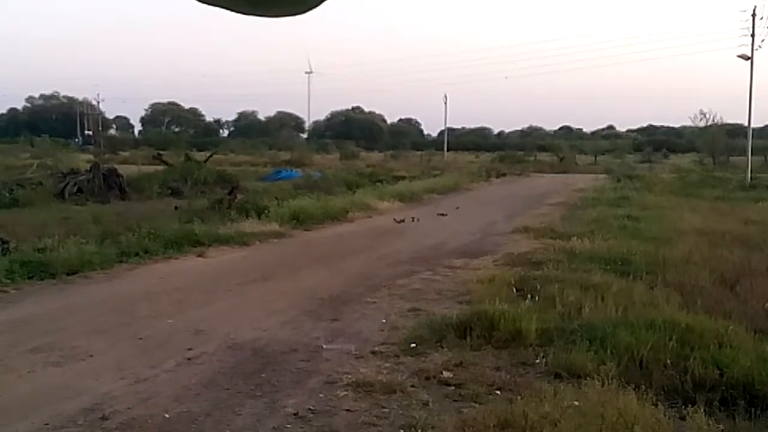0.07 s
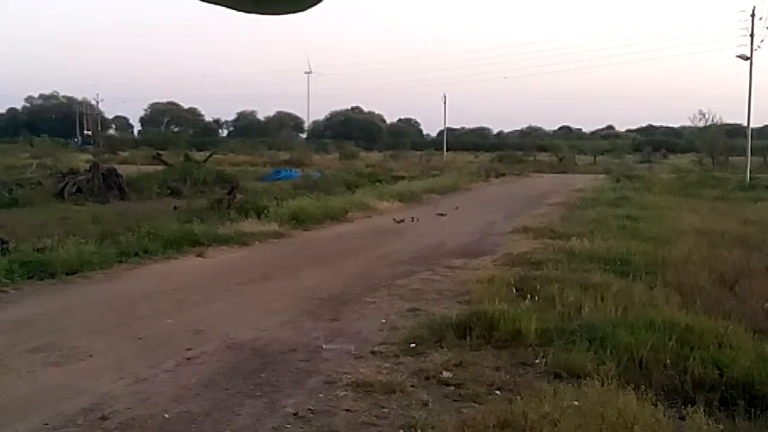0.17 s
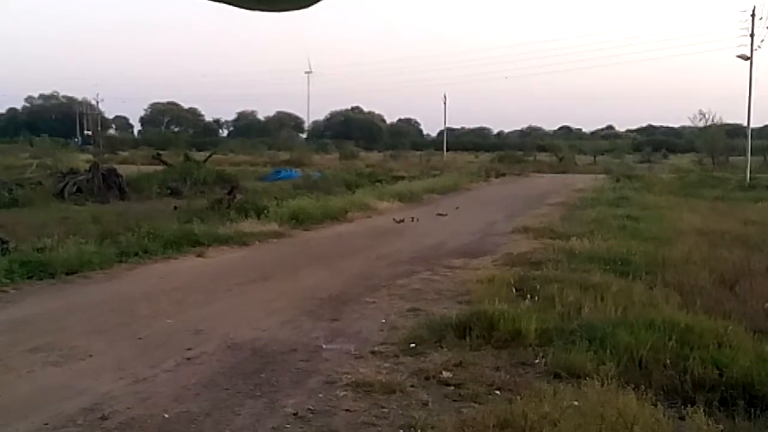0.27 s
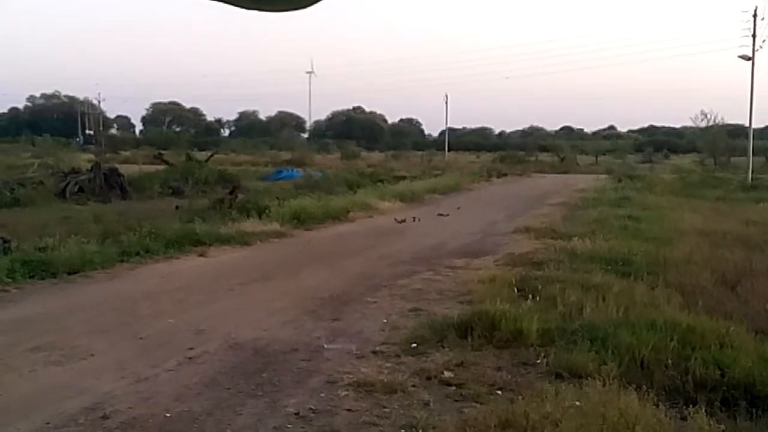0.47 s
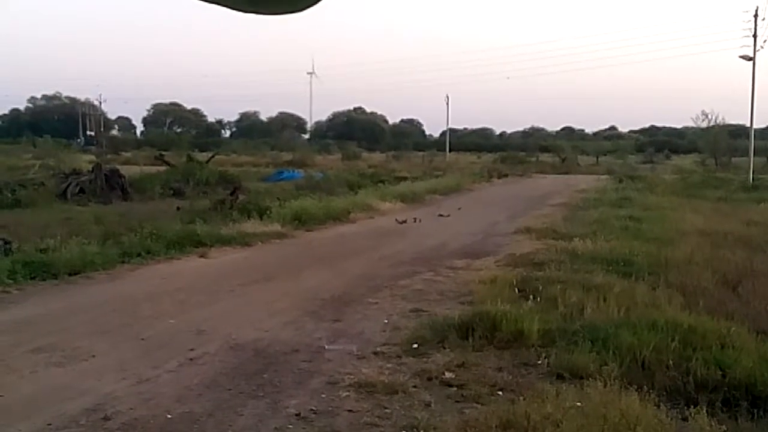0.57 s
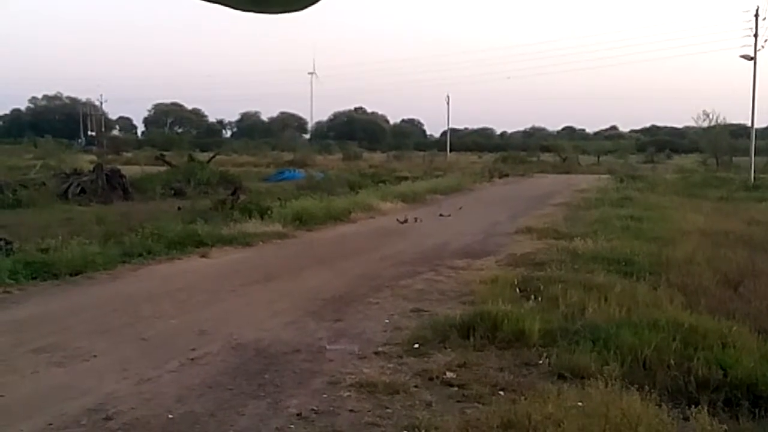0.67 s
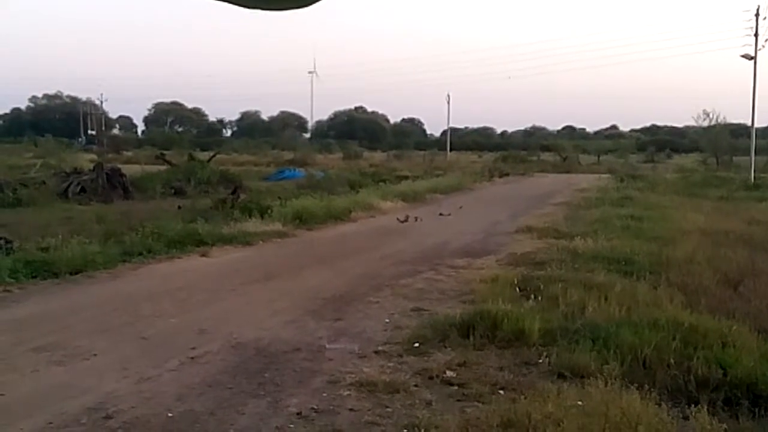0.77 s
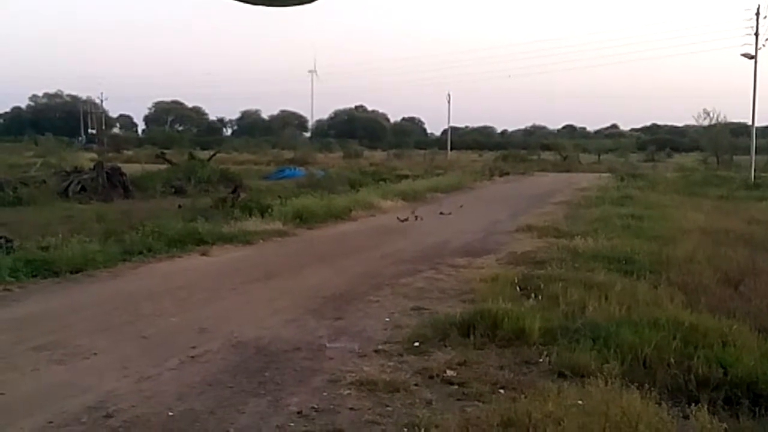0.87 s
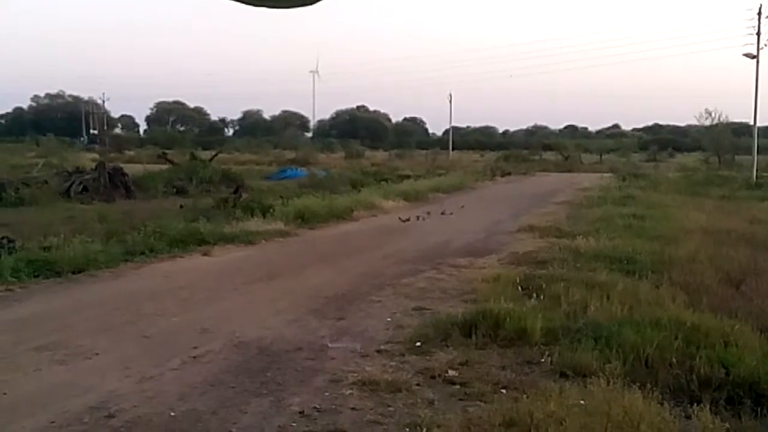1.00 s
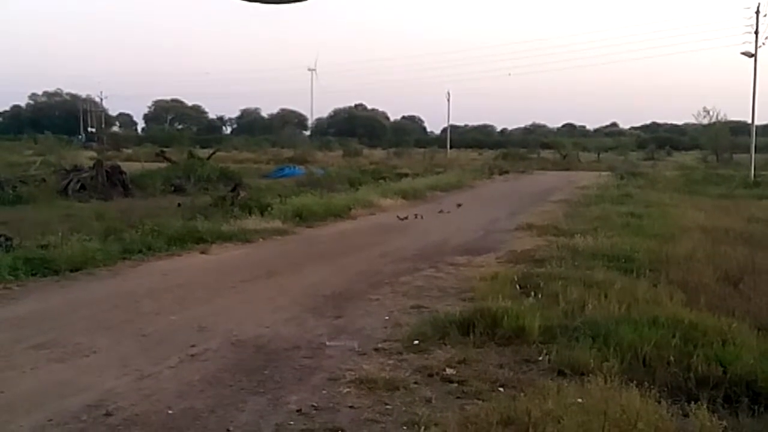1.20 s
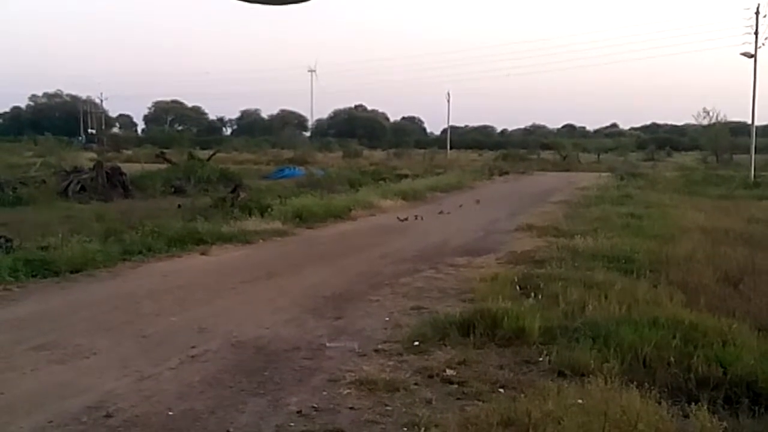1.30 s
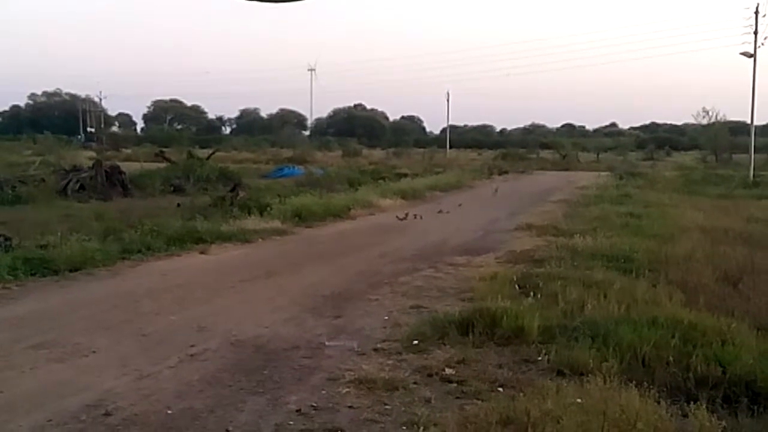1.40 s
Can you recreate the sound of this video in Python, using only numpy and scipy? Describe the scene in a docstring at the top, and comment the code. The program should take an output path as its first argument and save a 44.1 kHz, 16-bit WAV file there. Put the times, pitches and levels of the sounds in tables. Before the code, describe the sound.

One short, harsh, high bird squawk bursts out close to the microphone near the start, then only quiet distant chirps, throbbing wails, faint insect buzzes and soft air remain over open fields beside a dirt road.

```python
"""One harsh bird squawk close by, on a dirt road through open fields.
The squawk sums a steady low voice, two roughly wavering high whistles and rasping noise shaped by the throat.
A flutter pulses the whistles and rasp, then dies out, and the whistles clear towards the end.
Far off, birds wail, chirp and hoot as gliding sines, and insects buzz as narrow noise, over a soft wash of air.
Delayed copies of the squawk are faint echoes from ground and bushes; grass and trees add a diffuse tail."""
import sys
import numpy as np
from scipy import signal
from scipy.fft import rfft, irfft
from scipy.io import wavfile

SR = 44100
rng = np.random.default_rng(int(sys.argv[2]) if len(sys.argv) > 2 else 0)


def materialize(psi):
    """Save the field psi as 16-bit PCM at rate SR to the path in sys.argv[1].

    A 1-D psi becomes a single channel; in a 2-D psi each row is a channel.
    """
    bounded = np.clip(np.atleast_2d(psi).T, -1, 1)
    quanta = np.round(bounded * 32767).astype(np.int16)
    wavfile.write(sys.argv[1], SR, quanta)


N = 63945

CHIRP_FALL = 0.1005  # share of its start pitch that a chirp slides down
FAR_T60_S = .35  # time for the distant tail to decay by 60 dB


def undb(db):
    """Decibels to gain."""
    return 10 ** (np.asarray(db) / 20)


def unit(x):
    """Scale to rms 1."""
    return x / np.sqrt(np.mean(x ** 2))


def clock():
    """Time of every sample in seconds."""
    return np.arange(N) / SR


def curves(table):
    """The columns after time, joined by straight lines in time."""
    rows = np.array(table, float)
    return [np.interp(clock(), rows[:, 0], column) for column in rows.T[1:]]


def coloured(x, points):
    """Filter a sound by (f/Hz, level/dB) points joined over log frequency; rms 1."""
    hz, db = np.array(points, float).T
    f = np.fft.rfftfreq(N, 1 / SR) + 1  # offset avoids log(0)
    gain = undb(np.interp(np.log(f), np.log(hz), db))
    return unit(irfft(rfft(x) * gain, N))


def band(hz, width_hz):
    """Noise of rms 1 in a bell-shaped band; centred on 0 it is a random waver."""
    f = np.fft.rfftfreq(N, 1 / SR)
    bell = np.exp(-.5 * ((f - hz) / width_hz) ** 2)
    return unit(irfft(rfft(rng.standard_normal(N)) * bell, N))


def tone(hz):
    """A sine of rms 1 that follows a pitch curve."""
    phase = 2 * np.pi * np.cumsum(hz) / SR
    return np.sqrt(2) * np.sin(phase)


def note(start, length):
    """Progress 0-1 through a note, and its rounded envelope."""
    u = np.clip((clock() - start) / length, 0, 1)
    return u, np.sin(np.pi * u)


def scatter(x, t60, wet_db):
    """Diffuse tail thrown back by grass and trees: convolution with decaying noise of unit energy."""
    decay = np.exp(-np.log(1000) * clock() / t60)
    onset = np.minimum(clock() / .008, 1)
    tail = rng.standard_normal(N) * decay * onset
    return undb(wet_db) * signal.fftconvolve(x, tail / np.linalg.norm(tail))[:N]


def air():
    """The wash of the open fields as coloured noise, with soft swells and a faint low rumble."""
    # spectrum of the wash: f/Hz, relative level/dB
    wash_colour = [(15, -51), (25, -23), (71, -21.5), (119, -9), (227, -15), (399, -13.5), (665, -7.5),
                   (782, -9.5), (1080, -4), (1270, -7), (1530, -6), (2350, -11), (2620, -11.5),
                   (3160, -6.5), (3520, -4.5), (3820, -5), (4250, -9), (4740, -15), (5870, -14),
                   (6370, -13.5), (7090, -23.5), (8110, -38.5), (15500, -52.5)]
    # loudness of the wash: t/s, level/dB
    wash_level = [(0, -53), (.2, -53), (.48, -53), (.62, -49.5), (.8, -54), (.92, -51.5), (1.1, -53),
                  (1.33, -55), (1.41, -52.5), (1.45, -52.5)]
    # distant swells of narrow noise: t/s, length/s, centre f/Hz, width/Hz, level/dB
    swell_notes = [(0.0, 0.12, 221, 8.3, -66), (.14, 0.12, 163.4, 16, -63), (0.338, 0.076, 345, 16, -60.5),
                   (0.847, 0.13, 1050, 260, -64), (1.013, 0.33, 136, 14.6, -72),
                   (1.126, .12, 1933, 48, -60.5), (1.372, 0.073, 960, 210, -56.5)]
    # loudness of the rumble: t/s, level/dB
    rumble_level = [(0, -81.5), (.65, -80), (.85, -66.5), (1.0, -82.5), (1.2, -70), (1.45, -78.5)]
    wash = coloured(rng.standard_normal(N), wash_colour) * undb(curves(wash_level)[0])
    swells = 0
    for start, length, hz, width, db in swell_notes:
        swells = swells + undb(db) * note(start, length)[1] * band(hz, width)
    rumble = band(hz=69, width_hz=9.8) * undb(curves(rumble_level)[0])
    return wash + swells + rumble


def chirp(start, length, hz, db, fall):
    """A short sine whistle that slides down by a share of its pitch; a fall of 0 holds it level."""
    u, envelope = note(start, length)
    return undb(db) * envelope * tone(hz * (1 - fall * u))


def flock(count=150):
    """Many farther birds: chirps at random times and pitches run together with their diffuse tail."""
    # loudness of the flock: t/s, level/dB
    flock_level = [(0, -43), (.1, -65), (.17, -50), (.45, -51), (.55, -53.5), (.69, -48.5), (.79, -68.5),
                   (.93, -50.5), (1.05, -75), (1.2, -53.5), (1.3, -60), (1.36, -51.5), (1.45, -59.5)]
    centre_hz, spread = 3799, .11  # spread: largest pitch offset as a share of the centre
    chirps = 0
    for when, length, pitch, size in rng.random((count, 4)):
        start_s = when * N / SR - .01
        length_s = 0.01424 + 0.0191 * length
        hz = centre_hz * (1 + spread * (2 * pitch - 1))
        chirps = chirps + chirp(start_s, length_s, hz, -6 * size, CHIRP_FALL)
    blurred = chirps + scatter(chirps, FAR_T60_S, wet_db=2.5)
    return unit(blurred) * undb(curves(flock_level)[0])


def wails():
    """A far bird repeats a throbbing note: pitch arcs up a little, then sags, while level pulses."""
    # wailing calls: t/s, length/s, top f/Hz before waver, level/dB before envelope and throb
    wail_notes = [(0.005, 0.18, 1609, -50), (0.487, .285, 1630, -52), (1.347, 0.21, 1582, -51.5)]
    top_share, sag, waver = .24, .32, 0.0219  # place of the top in the note; pitch shares
    throb_hz, throb_depth, roundness = 88, .42, 0.6  # roundness: exponent on the envelope
    out = 0
    for start, length, hz, db in wail_notes:
        u, envelope = note(start, length)
        pitch = hz * (1 - sag * (u - top_share) ** 2 + waver * band(0, 250))
        throb_rate = throb_hz * (1 + 0.076 * band(0, 34))
        throb = 1 + throb_depth * tone(throb_rate)
        out = out + undb(db) * abs(envelope) ** roundness * throb * tone(pitch)
    return out


def small_birds():
    """Sliding sines as chirps and pips, level ones as hoots, and one husky whistle arching in pitch."""
    # falling chirps: t/s, length/s, start f/Hz, level/dB at the envelope's top
    chirp_notes = [(.12, 0.029, 3705, -49.5), (.152, .025, 3820, -47.5), (.188, 0.025, 3820, -46.5),
                   (0.381, 0.019, 3713, -45), (.425, 0.027, 3820, -52), (0.675, 0.029, 4350, -50),
                   (.725, 0.035, 3280, -58), (.817, .012, 3700, -51), (0.836, .014, 3780, -52),
                   (0.867, 0.034, 3640, -54.5), (0.901, 0.032, 3880, -50), (0.925, 0.023, 3725, -46),
                   (.96, 0.013, 3754, -47), (1.071, 0.027, 3620, -53), (1.129, .028, 3850, -48.5),
                   (1.16, 0.022, 3580, -52.5), (1.187, .035, 3780, -51), (1.344, 0.019, 3600, -47.5),
                   (1.372, 0.016, 3670, -53), (1.401, 0.017, 3815, -49), (1.44, .02, 3800, -46.5)]
    # thin high pips: t/s, level/dB at the envelope's top
    pip_notes = [(.449, -51.5), (0.491, -53), (1.066, -59.5), (1.106, -53), (1.152, -53.5)]
    # faint hoots: t/s, length/s, f/Hz, level/dB at the envelope's top
    hoot_notes = [(0.593, 0.068, 596, -56.5), (0.838, 0.098, 480.5, -58.5)]
    chirps = sum(chirp(*row, CHIRP_FALL) for row in chirp_notes)
    pips = sum(chirp(start, .013, 5790, db, fall=.071) for start, db in pip_notes)
    hoots = sum(chirp(*row, fall=0) for row in hoot_notes)

    u, envelope = note(start=.578, length=.057)
    foot_hz, top_hz = 4040, 5500
    arch_hz = top_hz - (top_hz - foot_hz) * abs(2 * u - 1) ** 3
    husky_hz = arch_hz + 150 * band(0, 510)  # fast random waver, 150 Hz rms
    arch = undb(-55) * np.sqrt(abs(envelope)) * tone(husky_hz)
    return chirps + pips + hoots + arch


def flutter():
    """A fast, slightly uneven pulsing from a sharpened cosine; it dies out near the end of the call."""
    t = clock()
    rate_hz, peak_s, jitter = 133.1, .2417, .03  # jitter: rms, in turns
    sharpness, floor, scatter_db = 3.2, 0.36, 1.2
    end_s, fade_s = .333, 0.012
    turns = rate_hz * (t - peak_s) + jitter * band(0, 100)
    beat = (.5 + .5 * np.cos(2 * np.pi * turns)) ** sharpness
    beat = beat * undb(scatter_db * band(0, 100))
    depth = np.clip((end_s - t) / fade_s, 0, 1)
    return 1 + depth * (unit(floor + beat) - 1)


def low_voice():
    """A nearly steady harmonic note, its octave mostly far stronger than its fundamental."""
    # pitch and balance: t/s, fundamental f/Hz, fundamental level/dB, octave level/dB
    voice = [(.24, 1375, -49, -63), (.25, 1398, -49, -32), (.26, 1428, -50, -35.5), (.275, 1429, -49, -31),
             (.295, 1431, -48.5, -31), (.312, 1438, -49, -31.5), (.326, 1396, -50.5, -42),
             (.336, 1472, -45, -48), (.345, 1460, -60, -47)]
    # upper harmonics: multiple of the fundamental, level/dB relative to the octave
    harmonics = [(3, -14), (4, -10)]
    pitch, root_db, octave_db = curves(voice)
    pitch = pitch * (1 + 0.0026 * band(0, 250))
    upper = tone(2 * pitch)
    for multiple, db in harmonics:
        upper = upper + undb(db) * tone(round(multiple) * pitch)
    return undb(root_db) * tone(pitch) + undb(octave_db) * upper


def high_voice(pulsing):
    """Two whistles, rough from fast pitch waver, clear and sink; faint octaves and a sum tone add shine."""
    # whistles before waver and flutter: t/s, lower f/Hz, lower level/dB, upper f/Hz, upper level/dB
    whistle_pair = [(.24, 4966, -32.5, 6340, -25), (.25, 5145, -34.5, 6457, -36),
                    (.272, 5220, -34.5, 6603, -29), (.295, 5190, -36.5, 6620, -25.5),
                    (.308, 5200, -27.5, 6650, -27), (.317, 5143, -28.5, 6625, -21),
                    (.326, 5122, -24.5, 6590, -23.5), (.338, 5050, -24, 6570, -29),
                    (.348, 4980, -29.5, 6530, -27.5)]
    # roughness of the whistles: t/s, share of the full pitch waver (0-1)
    roughness = [(.242, .15), (.252, .7), (.305, .5), (.316, .18), (.33, .1), (.35, .12)]
    lower_hz, lower_db, upper_hz, upper_db = curves(whistle_pair)
    waver_hz = 360 * curves(roughness)[0]  # rms pitch deviation
    lower_hz = lower_hz + waver_hz * band(0, 600)
    upper_hz = upper_hz + waver_hz * band(0, 600)

    overtone = undb(-24) * tone(1.705 * lower_hz)  # inharmonic
    lower = undb(lower_db) * (tone(lower_hz) + overtone)
    upper = undb(upper_db) * tone(upper_hz)
    lower_octave = undb(lower_db - 33) * tone(2 * lower_hz)
    sum_and_octave = undb(upper_db - 46) * (tone(lower_hz + upper_hz) + tone(2 * upper_hz))
    return pulsing * (lower + upper) + lower_octave + sum_and_octave


def squawk():
    """Both voices plus pulsing noise through the throat's resonances, with a sudden start and a quick end."""
    # loudness of the rasp: t/s, level/dB
    rasp_level = [(.24, -33), (.25, -32), (.265, -28.5), (.29, -27.5), (.318, -28.5), (.332, -35),
                  (.35, -39)]
    # throat colour of the rasp: f/Hz, relative level/dB
    throat = [(1000, -42), (2400, -24), (2750, 0), (3200, -16), (3750, -1), (4050, -8), (4280, -4),
              (4600, -17), (5200, 1), (5500, -35), (5850, 1), (6200, -4), (6700, 0.5), (7100, 0),
              (7500, -9.5), (8000, -21), (9000, -23), (10300, -24.5), (11600, -40), (13200, -37),
              (15500, -42)]
    start_s, end_s, attack_s, release_s = .2383, 0.3562, 0.0045, 0.0085
    t, pulsing = clock(), flutter()
    attack = np.clip((t - start_s) / attack_s, 0, 1)
    release = np.clip((end_s - t) / release_s, 0, 1)
    breath = pulsing ** 0.62 * rng.standard_normal(N)  # shallower flutter than the whistles
    rasp = undb(curves(rasp_level)[0]) * coloured(breath, throat)
    return attack * release * (low_voice() + high_voice(pulsing) + rasp)


def insects():
    """Short high buzzes: one narrow noise band opened by rounded envelopes."""
    # buzzes: t/s, length/s, level/dB at the envelope's top
    buzz_notes = [(0.673, 0.045, -59.5), (0.934, 0.07, -59), (1.248, 0.065, -59.5)]
    envelopes = sum(undb(db) * note(start, length)[1] for start, length, db in buzz_notes)
    return band(hz=6270, width_hz=340) * envelopes


def scene():
    """The near bird with its echoes and dulled diffuse tail, in front of the distant life."""
    # echoes from ground and bushes: delay/s, level/dB relative to the call
    echo_taps = [(.0105, -29), (.034, -18), (.047, -24.5)]
    call = squawk()
    lowpass = signal.butter(2, 6400, fs=SR, output="sos")
    dull = signal.sosfilt(lowpass, call)
    echoes = sum(undb(db) * np.roll(call, int(delay * SR)) for delay, db in echo_taps)
    near = call + scatter(dull, t60=0.53, wet_db=-20) + echoes
    far = wails() + small_birds() + insects()
    far = far + scatter(far, FAR_T60_S, wet_db=-6)
    return (near + far + flock() + air())[None]


def record(dry):
    """The recorder cuts the top with a steep low-pass at 15450 Hz."""
    lowpass = signal.ellip(10, .2, 80, 15450, fs=SR, output="sos")  # ripple and stopband in dB
    return signal.sosfilt(lowpass, dry)


dry = scene()
out = record(dry)
materialize(out)
```